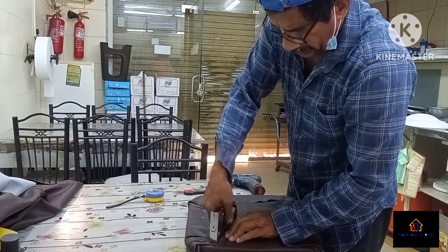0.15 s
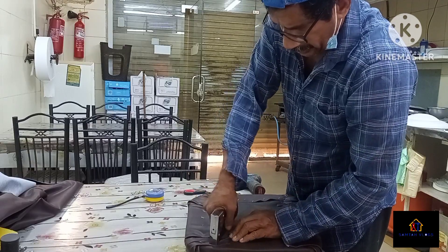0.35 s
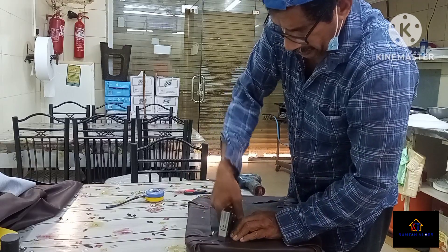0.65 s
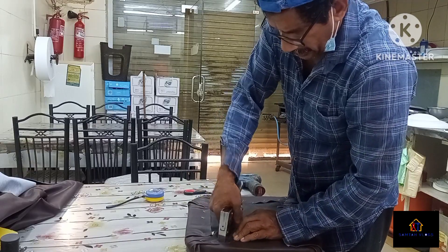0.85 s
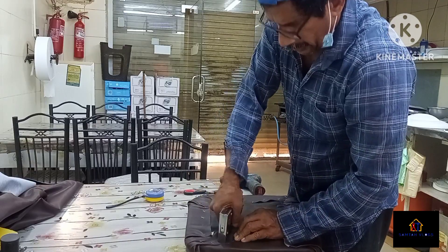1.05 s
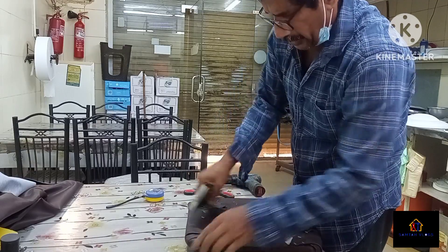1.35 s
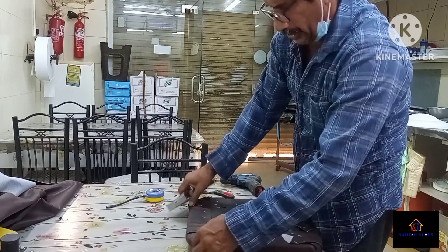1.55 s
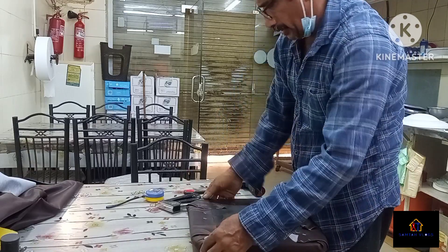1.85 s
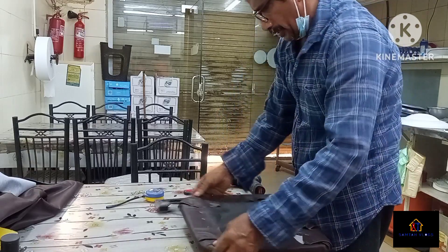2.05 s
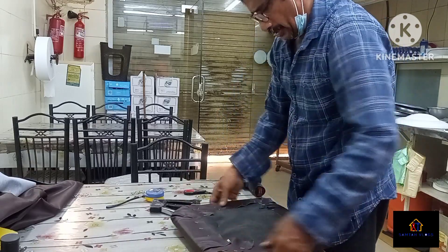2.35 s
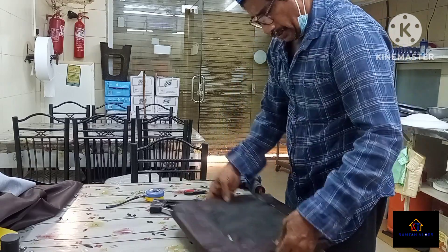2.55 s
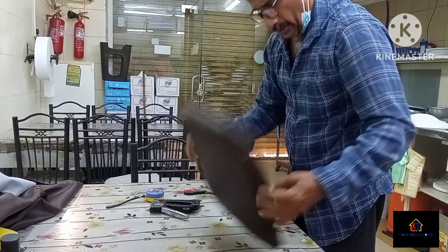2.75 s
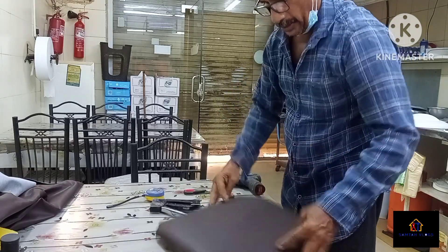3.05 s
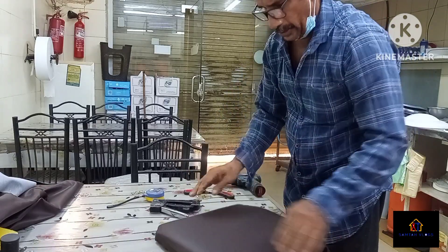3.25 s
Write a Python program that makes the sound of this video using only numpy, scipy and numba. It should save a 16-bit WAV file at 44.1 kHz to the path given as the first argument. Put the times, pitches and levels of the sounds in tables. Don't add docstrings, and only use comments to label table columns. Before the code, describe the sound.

A hand staple gun in a hard-walled room with a low fridge hum. An earlier shot's echo dies away with a soft knock at the start. Hard steely cracks with a wooden thump hit at 0.5 and, slightly softer, 1.2 seconds. The gun clatters down at 1.8, faint knocks and ticks follow around 2.3, and the board thuds heavily at 3.2. Phone compression squashes blows and swells echoes.

```python
import sys
import numpy as np
from scipy import signal
from scipy.fft import rfft, irfft
from scipy.io import wavfile
from scipy.ndimage import uniform_filter1d
from numba import njit

SR = 44100
rng = np.random.default_rng(int(sys.argv[2]) if len(sys.argv) > 2 else 0)


def master_out(mix):
    frames = np.transpose(np.atleast_2d(mix))
    ceiling = np.clip(frames, -1, 1)
    pcm = np.round(ceiling * 32767).astype(np.int16)
    wavfile.write(sys.argv[1], SR, pcm)


def to_linear_factor(level_db):
    exponent = np.asarray(level_db, float) / 20
    return 10 ** exponent


N = 149940
LEAD_S = 0.4


def evened(x):
    return x / np.sqrt(np.mean(x ** 2) + 1e-20)


def read(points, hz):
    f, value = np.transpose(points)
    return np.interp(np.log(hz + 1), np.log(f + 1), value)


def tinted(size, points):
    hz = np.fft.rfftfreq(size, 1 / SR)
    white = rfft(rng.standard_normal(size))
    return evened(irfft(white * to_linear_factor(read(points, hz)), size))


def add(mix, s, sound):
    part = mix[round((s + LEAD_S) * SR):][:len(sound)]
    part += sound[:len(part)]


def fade(t, t60, rise_s):
    return np.minimum(t / rise_s, 1) * to_linear_factor(-60 * t / t60)


def hum(size):
    # (frequency [Hz], level [dB])
    air = [(40, -38), (70, -14), (200, -0.5), (450, -6), (1500, -17.5), (5000, -26.5), (9500, -24.5),
           (13000, -27)]
    # (frequency [Hz], width [Hz], level [dB])
    whines = [(126.7, 2.7, -52), (238.7, 51, -40), (400, 51, -49.5), (684.6, 20, -56), (809, 23, -56),
              (1704, 200, -59.5), (3770, 50, -65.5), (6660, 150, -83)]
    motor_hz = [120, 122.27, 244.5, 270, 219.5]
    motor_db = [-45.5, -49.5, -38, -48, -49]
    beat_s = 0.4

    out = to_linear_factor(-42) * tinted(size, air)
    hz = np.fft.rfftfreq(size, 1 / SR)
    for f, width, db in whines:
        peak = 1 / (1 + ((hz - f) / width * 2) ** 2)
        whine = irfft(rfft(rng.standard_normal(size)) * peak, size)
        out = out + to_linear_factor(db) * evened(whine)
    t = np.arange(size) / SR - LEAD_S - beat_s
    for k, (f, db) in enumerate(zip(motor_hz, motor_db)):
        sign = (-1) ** k
        out = out + sign * to_linear_factor(db + 1.5) * np.sin(2 * np.pi * f * t)
    return out


def echo(points, hz0, lift_db, spread):
    # (frequency [Hz], fade t60 [s])
    room = [(100, 1), (260, 0.8), (700, 0.53), (1840, 0.64), (4850, 0.67), (12800, 0.51)]
    hz, t, z = signal.stft(tinted(SR, points), SR, nperseg=512)
    lift = lift_db * np.exp(-(np.log((hz + 1) / hz0) / spread) ** 2)
    lift = lift + 1.58 * uniform_filter1d(rng.standard_normal(len(hz)), size=2)
    decay_db = -60 * t / read(room, hz)[:, None]
    tail = signal.istft(z * to_linear_factor(lift[:, None] + decay_db), SR, nperseg=512)[1]
    build_up = np.minimum(np.arange(len(tail)) / SR / 0.014, 1)
    return tail * build_up


def shots(size):
    # (time [s], strength [dB], echo [dB], loudest echo pitch [Hz])
    blows = [
        (-.2, 0, -2.5, 2040),
        (0.4893, 16, -4.5, 2130),
        (1.1927, 11.5, -5, 1440),
    ]
    # (delay [s], level [dB], fade t60 [s])
    stages = [
        (-.0075, -40, 0.047),
        (0, -12, .045),
        (.0025, 9.5, 0.022),
        (.0062, -13, .025),
    ]
    # (frequency [Hz], level [dB], fade t60 [s])
    steel = [(1570, 2.5, 0.008), (2190, -3.5, 0.027), (3100, -2, 0.01), (4340, -5, 0.032), (6050, -3, 0.03),
             (7700, -6, 0.022), (8600, -25, 0.012)]
    # (frequency [Hz], level [dB])
    snap = [(100, -10), (250, -12), (700, 8), (1100, 0), (1800, -3), (3000, 3.5), (6000, 0), (15000, 6.5)]
    # (frequency [Hz], level [dB])
    shot_echo = [(100, -17.5), (260, -2.5), (650, -4), (1100, -9.5), (1600, -5), (3000, -7), (6000, -7.5),
                 (15000, -5)]

    mix, t = np.zeros(size), np.arange(6000) / SR
    for s, db, echo_db, hz in blows:
        for delay, stage_db, t60 in stages:
            ring = np.zeros(len(t))
            for f, mode_db, mode_t60 in steel:
                tone = np.sin(2 * np.pi * (f * t + rng.random()))
                ring += to_linear_factor(mode_db - 60 * t / mode_t60) * tone
            ring *= np.minimum(t / 0.00016, 1)
            crack = tinted(len(t), snap) * fade(t, t60, 0.0002)
            add(mix, s + delay, to_linear_factor(db + stage_db) * (0.5 * crack + to_linear_factor(-14.5) * ring))
        thump = np.sin(2 * np.pi * 250 * t) * fade(t, 0.057, 0.0025)
        add(mix, s + 0.0018, to_linear_factor(db - 7.5) * thump)
        add(mix, s, to_linear_factor(echo_db) * echo(shot_echo, hz, lift_db=2.5, spread=0.3))
    return mix


def thuds(size):
    # (time [s], ring [dB], ring pitch [Hz], crack [dB], echo [dB])
    knocks = [(0.037, -10, 386, -29, -29), (.046, -18.5, 245, -49, -42), (.765, -25.5, 400, -50, -51),
              (1.787, -13, 240, -14.5, -30), (1.797, -13, 314, -9.5, -18.5), (1.806, -7.5, 204, -17, -16.5),
              (2.291, -25.5, 316, -29, -36), (2.335, -25, 195.6, -33, -39), (2.359, -18, 259, -18, -26),
              (2.403, -16, 240, -25.5, -37), (2.34, -18.5, 115, -52, -32), (2.3662, -19.5, 443, -23, -37),
              (2.376, -22.5, 400, -37, -41), (3.2518, -8.5, 255, -38, -21.5), (3.204, -16, 278, -14, -27),
              (3.2067, -1, 220, -36, -16), (3.2304, 2.5, 219.4, -30, -16.5)]
    # (frequency [Hz], level [dB])
    dull_crack = [(200, -13), (700, 10), (1500, -5), (2300, -1.5), (4000, -12), (7000, -19.5), (15000, -29)]
    # (frequency [Hz], level [dB])
    clatter = [(60, -15.5), (100, -5.5), (250, -9.5), (550, -2), (1200, -11.5), (2000, -22), (4000, -31.5),
               (15000, -21)]
    ring_t60, crack_t60 = 0.088, 0.032

    mix, t = np.zeros(size), np.arange(8000) / SR
    for s, ring_db, hz, crack_db, echo_db in knocks:
        ring = np.sin(2 * np.pi * hz * t) * fade(t, ring_t60, 0.00094)
        crack = tinted(len(t), dull_crack) * fade(t, crack_t60, 0.00036)
        add(mix, s, to_linear_factor(ring_db) * ring + to_linear_factor(crack_db) * crack)
        add(mix, s, to_linear_factor(echo_db) * echo(clatter, hz, lift_db=10, spread=0.42))
    return mix


def ticks(size):
    # (time [s], level [dB], centre pitch [Hz], echo [dB])
    clicks = [(.3235, -24.5, 6300, -43.5), (.324, -32.5, 2800, -52), (.964, -34, 7200, -52),
              (1.7552, -33.5, 4000, -47), (1.7542, -44, 12000, -37), (1.81, -12, 1900, -30.5),
              (1.8005, -20, 9500, -36), (1.8032, -18.5, 4100, -34), (1.7732, -31, 2200, -41),
              (2.03, -34, 3800, -51), (2.286, -37, 2600, -56), (2.3005, -41, 2500, -44),
              (2.3585, -26, 1600, -40.5), (2.3252, -37, 2500, -43), (2.339, -31.5, 4000, -64),
              (2.3395, -37, 15000, -40), (2.341, -40, 8500, -60), (2.404, -51, 3200, -44.5),
              (2.548, -38, 14500, -48), (3.221, -17, 2900, -24.5), (3.2548, -21, 2400, -46),
              (3.227, -24, 1850, -40), (3.332, -27, 3200, -55), (3.357, -27, 4600, -45),
              (1.7878, -21.5, 2100, -31.5)]
    mix, t = np.zeros(size), np.arange(2000) / SR
    envelope = fade(t, t60=0.03, rise_s=0.001)
    for s, db, hz, echo_db in clicks:
        colour = [(hz / 5, -26), (hz / 2, -7), (hz, 0), (hz * 2, -12), (hz * 5, -30)]
        add(mix, s, to_linear_factor(db) * tinted(len(t), colour) * envelope)
        add(mix, s, to_linear_factor(db - 9) * np.sin(2 * np.pi * hz * t) * envelope)
        add(mix, s, to_linear_factor(echo_db) * echo(colour, hz, lift_db=1.5, spread=0.21))
    return mix


def scene():
    size = N + round(LEAD_S * SR)
    mix = hum(size) + shots(size) + thuds(size) + ticks(size)
    return mix[None, -N:]


@njit
def follow(over_db, grab, let_go):
    out, g = np.zeros(len(over_db)), 0.
    for i in range(len(over_db)):
        g += (over_db[i] - g) * (grab if over_db[i] > g else let_go)
        out[i] = g
    return out


def top_cut(x):
    return signal.sosfilt(signal.butter(12, 16680, fs=SR, output="sos"), x)


def record(dry):
    # (frequency [Hz], level [dB])
    mic = [(3000, 0), (6600, -4.5), (8000, -8.5), (9300, -5.5), (11000, -14.5), (13000, -23), (14200, -18),
           (15200, -11.5)]
    # (frequency [Hz], width [Hz], level [dB])
    case = [(1830, 330, 2.5), (3800, 180, 1), (4700, 67, 2), (6650, 670, 3), (9070, 830, 1.5)]
    knee_db, squash = -9, 1
    grab_s, let_go_s = 0.0009, 0.028
    ceiling = 0.64

    hz = np.linspace(0, SR / 2, 257)
    colour_db = read(mic, hz)
    for f, width, db in case:
        colour_db = colour_db + db * np.exp(-((hz - f) / width) ** 2)
    mic_filter = signal.firwin2(511, hz, to_linear_factor(colour_db), fs=SR)
    x = signal.oaconvolve(dry, mic_filter[None], "same")

    power_db = 10 * np.log10(abs(uniform_filter1d(x[0] ** 2, size=130)) + 1e-12)
    over_db = squash * np.maximum(power_db - knee_db, 0)
    cut_db = follow(over_db, 1 / (grab_s * SR), 1 / (let_go_s * SR))
    x = np.tanh(x / to_linear_factor(cut_db) / ceiling) * ceiling

    treble_limit = signal.firwin(511, 15520, window=("kaiser", 7), fs=SR)
    x = signal.oaconvolve(x, treble_limit[None], "same")
    low_cut = signal.butter(4, 67, "high", fs=SR, output="sos")
    x = signal.sosfilt(low_cut, x)
    return top_cut(x)


dry = scene()
out = record(dry)
master_out(out)
```